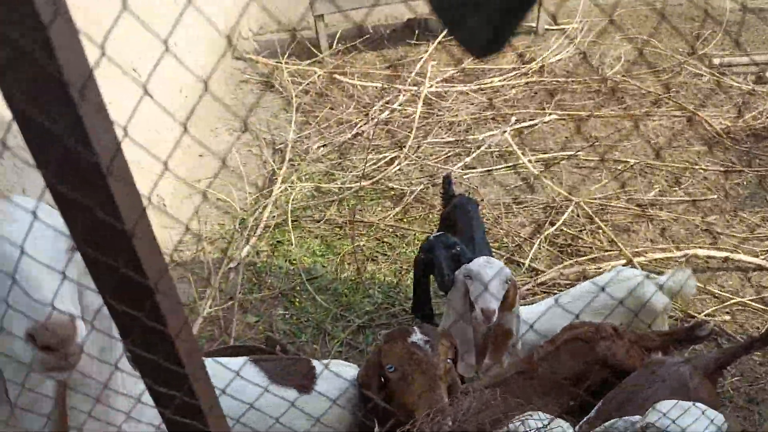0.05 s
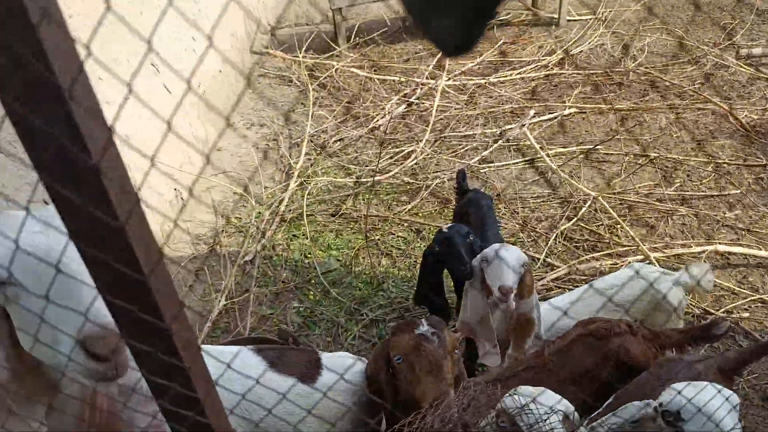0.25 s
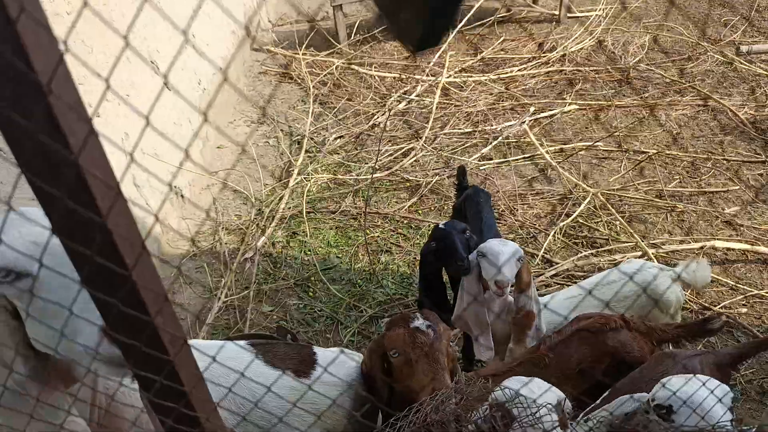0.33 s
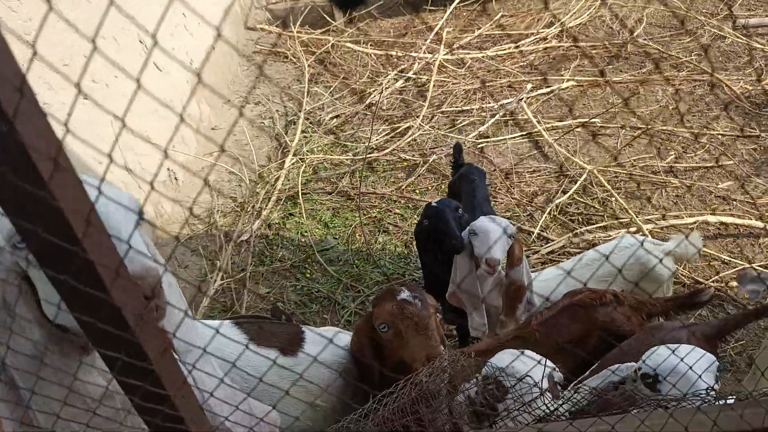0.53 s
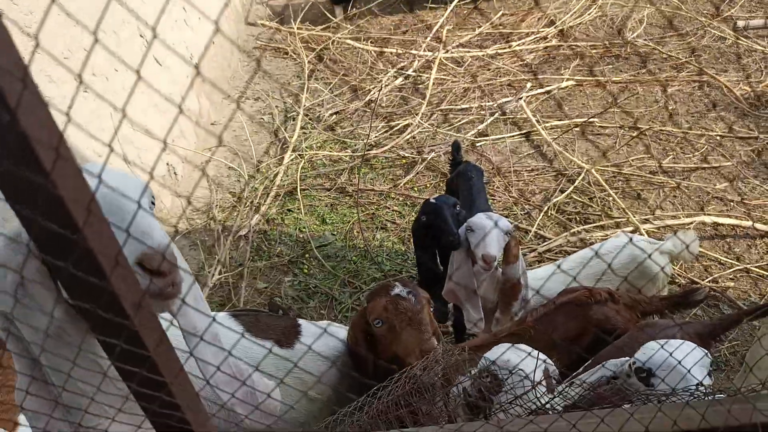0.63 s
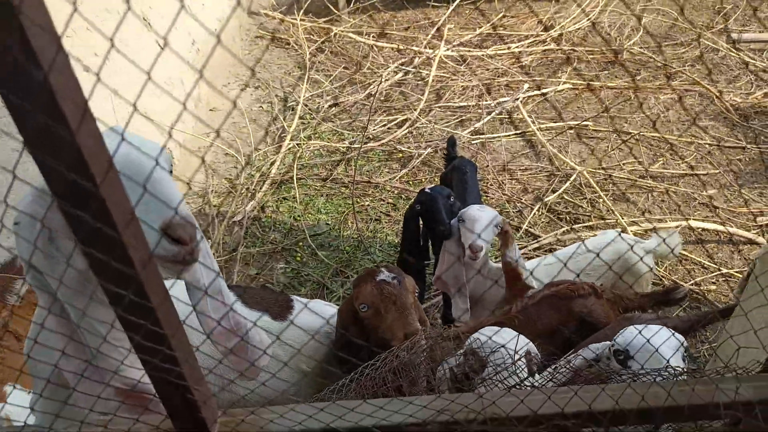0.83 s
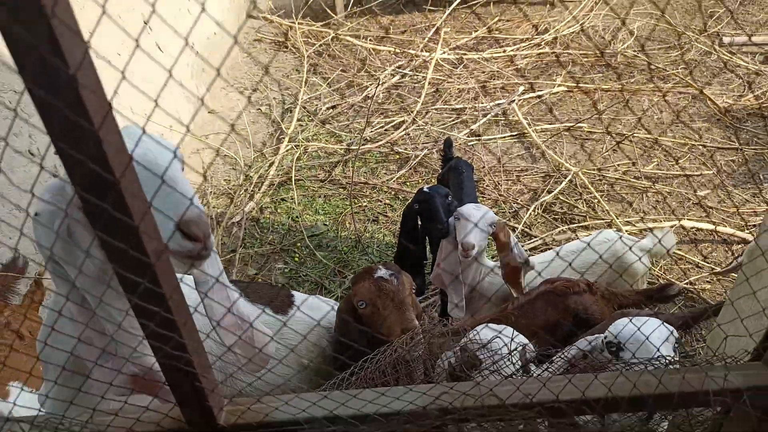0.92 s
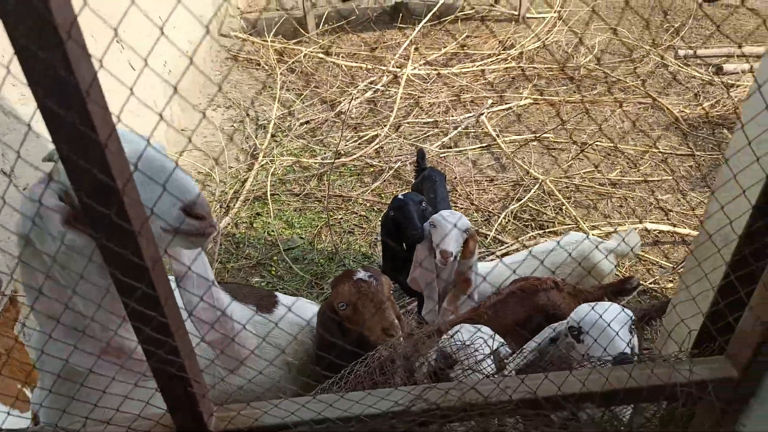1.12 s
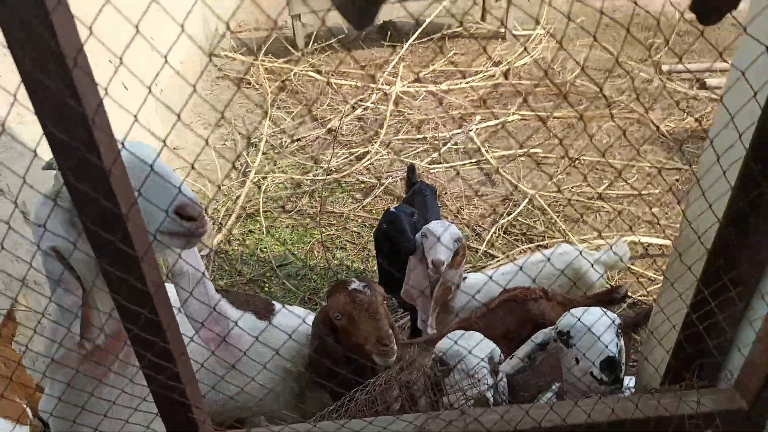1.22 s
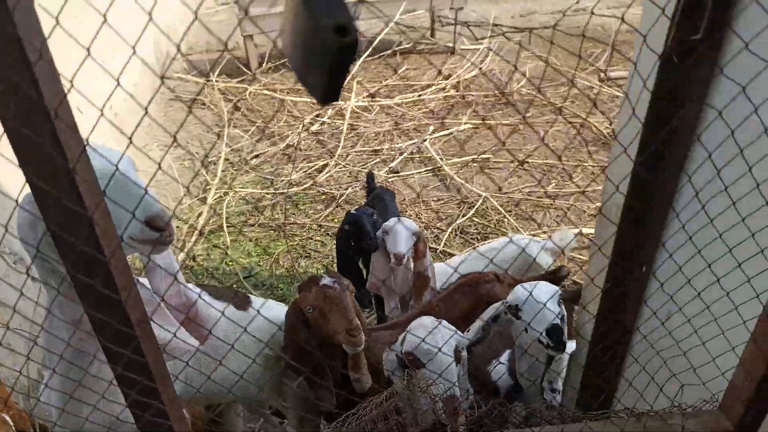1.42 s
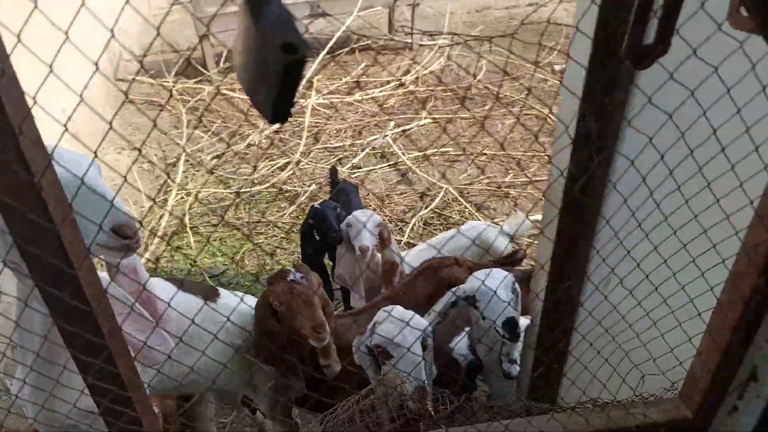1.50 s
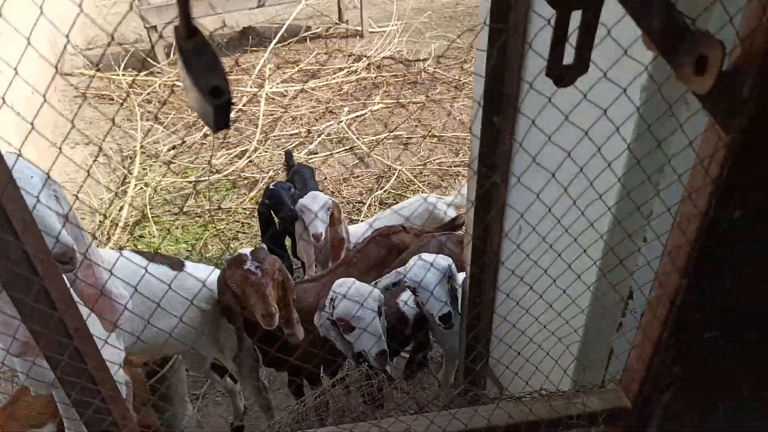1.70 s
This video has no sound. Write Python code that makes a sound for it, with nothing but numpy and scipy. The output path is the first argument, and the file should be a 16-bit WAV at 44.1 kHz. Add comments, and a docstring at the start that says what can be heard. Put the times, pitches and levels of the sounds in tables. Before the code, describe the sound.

In an outdoor pen, the hinge of a steel mesh gate scrapes and squeaks near the microphone, with light wind buffeting. Two sharp, quick knocks follow, and the wire mesh rattles and starts to fade.

```python
"""In a farm pen, a steel gate covered in wire mesh swings open close to the microphone.
Stick-slip friction makes its dry hinge rasp and squeal, jumping from one pitch to the next.
The gate knocks twice; then the mesh rattles, wire against wire, and the frame hums in its low modes.
Light wind bumps the microphone ports."""
import sys
import numpy as np
from scipy import signal
from scipy.fft import rfft, irfft, next_fast_len
from scipy.io import wavfile
from scipy.ndimage import map_coordinates

SR = 44100
rng = np.random.default_rng(int(sys.argv[2]) if len(sys.argv) > 2 else 0)


def materialize(psi):
    """Save the field psi as 16-bit PCM at rate SR to the path in sys.argv[1].

    A 1-D psi becomes a single channel; in a 2-D psi each row is a channel.
    """
    bounded = np.clip(np.atleast_2d(psi).T, -1, 1)
    quanta = np.round(bounded * 32767).astype(np.int16)
    wavfile.write(sys.argv[1], SR, quanta)


N = 77175
TIME = np.arange(N) / SR


def amp(db):
    """Amplitude ratio of a level in decibels."""
    return 10 ** (np.asarray(db) / 20)


def unit(x):
    """Normalisation to rms 1."""
    return x / np.sqrt(np.mean(x ** 2) + 1e-20)


def along(points, hz):
    """Interpolation of (f/Hz, value) points on a logarithmic frequency axis."""
    f, values = np.transpose(points)
    return np.interp(np.log(hz + 1), np.log(f + 1), values)


def curves(rows):
    """Linear interpolation in time: one curve for each column after t/s."""
    times, *columns = np.transpose(rows)
    return [np.interp(TIME, times, column) for column in columns]


def wobble(rate):
    """Smooth random modulation: a spline through `rate` knots a second."""
    return map_coordinates(rng.standard_normal(4096), [TIME * rate], mode="wrap")


def filtered(x, response):
    """Linear filtering: the spectrum of x times a frequency response."""
    size = next_fast_len(N + SR // 2)
    return irfft(rfft(x, size) * response(np.fft.rfftfreq(size, 1 / SR)), size)[..., :N]


def coloured(x, colour):
    """Spectral shaping by (f/Hz, relative level/dB) points, at rms 1."""
    return unit(filtered(x, lambda hz: amp(along(colour, hz))))


def noise(colour, alike):
    """Partly coherent stereo noise: the share `alike` of its power is common to both sides."""
    white = rng.standard_normal((3, N))
    return coloured(np.sqrt(1 - alike) * white[:2] + np.sqrt(alike) * white[2], colour)


def grains(colour, rate, spread_db, t60):
    """Shot noise: tiny random contacts of uneven strength, whose decaying bursts add in energy."""
    contacts = rng.random(N) < rate / SR
    energy = contacts * amp(spread_db * np.minimum(rng.standard_normal(N), 2.5)) ** 2
    decay = amp(-60 * TIME[:SR // 20] / t60) ** 2
    envelope = np.sqrt(np.abs(signal.fftconvolve(energy, decay)[:N]))
    return coloured(envelope * rng.standard_normal((2, N)), colour)


def free_decay(modes, t60, t):
    """Free vibration: each mode is an exponentially damped sinusoid."""
    return sum(amp(db - 60 * t / t60) * np.sin(2 * np.pi * hz * t) for hz, db in modes)


def ringing(modes, t60):
    """Forced vibration: random contacts keep the modes ringing, at rms 1."""
    response = free_decay(modes, t60, TIME)
    return unit(signal.fftconvolve(rng.standard_normal((2, N)), response[None], axes=1)[:, :N])


def wind():
    """Pressure fluctuations buffet the ports, mostly the left, with one stronger puff."""
    # buffeting (t/s, level/dB)
    buffeting = [(0, -34.5), (.05, -42), (.09, -28.5), (.2, -28), (.24, -36), (.34, -71), (.42, -38),
                 (.6, -47), (.8, -35), (.94, -67)]
    # its spectrum (f/Hz, level/dB)
    spectrum = [(20, -24), (60, 2), (115, 13), (170, -0.5), (260, -11.5), (450, -21), (1000, -53.5)]
    gust_s, gust_width_s, gust_db = 0.056, 0.015, -16.5
    gust = amp(gust_db) * np.exp(-.5 * ((TIME - gust_s) / gust_width_s) ** 2)
    envelope = amp(curves(buffeting)[0]) * amp([[0], [-14]]) + gust * amp([[0], [-24]])
    return envelope * noise(spectrum, alike=0.14)


def mesh():
    """Impacts between wires chatter and excite faint resonances; now and then a wire scrapes."""
    # shivering of the mesh (t/s, level/dB)
    shiver = [(0, -40.5), (.23, -49), (.6, -101), (1.03, -28.5), (1.11, -21.5), (1.19, -19.5),
              (1.30, -20.5), (1.37, -23.5), (1.44, -22.5), (1.55, -29.5), (1.75, -40)]
    # spectrum of the wire contacts (f/Hz, level/dB)
    chatter_spectrum = [(200, -37), (900, -8.5), (1700, -8.5), (2100, -2.5), (2700, -4.5), (3600, -3.5),
                        (4700, 2), (5800, -2), (6700, -0.5), (7900, -11), (9400, -16), (10500, -28),
                        (14000, -30), (16000, -60)]
    # wire resonances (f/Hz, level/dB)
    modes = [(2080, 10.5), (2353, 8.5), (4570, 11.5), (4770, -12), (5190, 10), (6430, 8)]
    # thin scrapes (t/s, width/s, level/dB)
    scrapes = [(0, 0.049, -33.5), (1.2, 0.033, -33.5), (1.655, 0.029, -37.5)]
    # their spectrum (f/Hz, level/dB)
    scrape_spectrum = [(2000, -11), (6000, 9), (9300, 1.5), (11000, -11), (15000, -12)]
    chatter = grains(chatter_spectrum, rate=2000, spread_db=3, t60=.025)
    ring = amp(-10.5) * ringing(modes, t60=0.2)
    scraping = sum(amp(db) * np.exp(-.5 * ((TIME - s) / width) ** 2) for s, width, db in scrapes)
    return amp(curves(shiver)[0]) * (chatter + ring) + scraping * noise(scrape_spectrum, alike=0)


def swing():
    """The swinging gate rustles: amplitude-modulated broadband noise."""
    # rustle (t/s, level/dB)
    rustle = [(0, -51), (.15, -54.5), (.18, -38), (.25, -61), (.28, -38), (.32, -77), (.59, -74),
              (.63, -48), (.785, -39), (.83, -49.5), (.865, -35.5), (.91, -61), (1.29, -32.5),
              (1.45, -33.5), (1.75, -44.5)]
    # its spectrum (f/Hz, level/dB)
    spectrum = [(30, 4), (90, -1.5), (250, 9), (450, 10.5), (900, 8.5), (2500, 5), (8000, -26.5)]
    return amp(curves(rustle)[0]) * noise(spectrum, alike=0.49)


def thumps():
    """Damped low transients: wind bumps one port or the other; the last falls with the first knock."""
    # soft thumps (t/s, f/Hz, rise/s, left level/dB, right level/dB)
    pulses = [(.199, 120, .003, -18, -44), (.780, 180, .004, -16, -37), (.848, 130, .004, -36, -23),
              (.868, 140, .004, -35, -23), (1.034, 145, .004, -32, -18)]
    out = np.zeros((2, N))
    for start, hz, rise, left_db, right_db in pulses:
        t = np.maximum(TIME - start, 0)
        envelope = (t / rise * np.exp(1 - t / rise)) ** 2
        out += amp([[left_db], [right_db]]) * envelope * np.sin(2 * np.pi * hz * t)
    return out


def stick_slip(rows, harmonics, ratio=1, edge_db=0):
    """Stick-slip oscillation: a harmonic squeal, brighter when louder, juddering and noisy when rough."""
    jitter_hz, judder_hz, judder_depth = 54.2, 125, .6
    grit, brighten, beat_db = .27, .12, 3.0
    pitch, level, rough = curves(rows)
    fade = np.clip((TIME - rows[0][0]) / .004, 0, 1) * np.clip(1 - (TIME - rows[-1][0]) / .02, 0, 1)
    phase = 2 * np.pi * np.cumsum(ratio * pitch + jitter_hz * rough * wobble(260)) / SR
    judder_phase = 2 * np.pi * np.cumsum(judder_hz * (1 + .25 * wobble(60))) / SR
    judder = 1 + judder_depth * rough * np.sin(judder_phase)
    out = np.zeros(N)
    for k, (_, db) in enumerate(harmonics, 1):
        skirt = grit * min(k, 3) * np.sqrt(np.abs(rough)) * (wobble(520) + 1j * wobble(520))
        size = amp(level + db + brighten * (k - 1) * (level + 20) + beat_db * wobble(95))
        edge = amp(edge_db * max(k - 2, 0))
        out += size * edge * np.imag((1 + skirt) * np.exp(1j * k * phase))
    return np.sqrt(2) * fade * judder * out


def hinge_squeals():
    """Self-excited vibration: friction locks the hinge on one pitch after another."""
    # course of each squeal (t/s, f/Hz, level/dB, roughness 0-1)
    chirp = [(.238, 4540, -48, .03), (.249, 4520, -29, .05), (.254, 4480, -8.5, .02), (.260, 4440, -9, .15),
             (.270, 4410, -17, .55), (.297, 4370, -17, .3), (.308, 4386, -29, .3), (.328, 4390, -25, .2),
             (.35, 4386, -32, .6), (.49, 4390, -36, .3)]
    groan = [(.28, 1465, -40, .5), (.305, 1475, -35, .4), (.355, 1600, -26, .25), (.42, 1630, -26, .25),
             (.45, 1639, -32, .15), (.64, 1638, -46, .2)]
    whistle = [(.395, 7065, -36, .2), (.413, 7057, -14, .08), (.432, 7057, -13.5, .04),
               (.44, 7058, -28, .05), (.505, 7058, -26, .08)]
    squeal = [(.48, 2020, -36, .1), (.491, 2005, -20.5, .12), (.506, 1990, -19.5, .2),
              (.526, 2000, -20, .5), (.546, 1986, -23.5, .2), (.56, 1984, -18.5, .07),
              (.595, 1983, -23, .1), (.65, 1982, -30, .25), (.72, 1981, -25, .08), (.785, 1980, -24, .1),
              (.812, 1980, -34, .1)]
    cheep = [(.64, 3280, -75, 0.53), (.655, 3266, -22, 0.53), (.672, 3245, -18, 0.37),
             (.71, 3336, -36.5, 0.13), (.80, 3226, -38, 0.12)]
    # harmonics of a squeal at -20 dB (harmonic number, relative level/dB)
    chirp_tones = [(1, -3), (2, -8.5), (3, -24)]
    groan_tones = [(1, 0), (2, -8.5), (3, -1.5), (4, -6)]
    squeal_tones = [(1, -8.5), (2, -.5), (3, 0), (4, -8), (5, -9), (6, -19), (7, -22)]
    # spectral tilt above the second harmonic (t/s, gain per harmonic/dB)
    tilt = [(.48, -4), (.505, 0), (.57, 0), (.66, -4.5)]
    side_ratio = 2767 / cheep[-1][1]  # a weaker, lower tone sounds along with the cheep
    return (stick_slip(chirp, chirp_tones)
            + stick_slip(groan, groan_tones)
            + stick_slip(whistle, [(1, 0.017)])
            + stick_slip(squeal, squeal_tones, edge_db=curves(tilt)[0])
            + stick_slip(cheep, [(1, 1.5), (2, -24)])
            + stick_slip(cheep, [(1, -11)], side_ratio))


def gate_ring(drive):
    """Convolution with a decaying impulse response: the steel rings on after whatever shakes it."""
    # decay times of the gate (f/Hz, t60/s)
    decay_times = [(200, .15), (2000, .26), (5000, .2), (15000, .15)]
    hz, t, white = signal.stft(rng.standard_normal((2, SR // 2)), SR, nperseg=256)
    decay = amp(-60 * t / along(decay_times, hz)[:, None])
    tail = signal.istft(white * decay, SR, nperseg=256)[1]
    return signal.fftconvolve(drive[None], tail / np.linalg.norm(tail[0]), axes=1)[:, :N]


def hinge_rasp():
    """Dry sliding friction: dense tiny contacts make a grainy noise and ring the hinge's modes."""
    # rasp (t/s, level/dB)
    rasp_level = [(.258, -46.5), (.282, -16.5), (.31, -24.5), (.345, -29.5), (.39, -15), (.425, -19),
                  (.45, -24.5), (.52, -24.5), (.58, -37.5), (.61, -26), (.64, -27), (.668, -24.5),
                  (.72, -34.5), (.845, -30.5), (.885, -23.5), (.96, -39.5), (1.03, -38), (1.08, -48)]
    # its spectrum (f/Hz, level/dB)
    spectrum = [(100, -86), (600, -26), (1200, -12), (1650, 1.5), (2700, 3), (3600, 1), (4600, 8.5),
                (5500, 2.5), (6500, 9.5), (8000, -2), (9600, -1), (10800, -26.5), (13000, -13.5),
                (16000, -31)]
    # resonances of the scraped hinge (f/Hz, level/dB)
    modes = [(3296, 3), (4665, 3), (4807, -16), (5380, -3), (6730, -15)]
    # their ringing (t/s, level/dB)
    ring_level = [(.30, -50), (.345, -29), (.41, -25), (.54, -44), (.6, -70)]
    rasp = amp(curves(rasp_level)[0]) * grains(spectrum, rate=3500, spread_db=3.5, t60=.016)
    return rasp + amp(curves(ring_level)[0]) * ringing(modes, t60=.16)


def hinge_shriek():
    """The last stick-slip oscillation, whose fundamental grows as the hinge slows."""
    # course of the shriek (t/s, f/Hz, level/dB, roughness 0-1)
    course = [(.812, 2100, -30, .1), (.819, 2070, -16, .12), (.833, 2026, -13, .02), (.858, 2028, -11, .03),
              (.872, 2040, -16, .3), (.89, 2068, -18, .6), (.925, 2074, -18, .25), (.968, 2071, -28, .3),
              (1.005, 2062, -23, .45), (1.016, 2062, -24, .45)]
    # its harmonics at -20 dB (harmonic number, relative level/dB)
    harmonics = [(1, -5), (2, -4), (3, -8.5), (4, -14), (5, -28), (6, -33), (7, -40)]
    # spectral tilt above the second harmonic (t/s, gain per harmonic/dB)
    tilt = [(.82, -5), (.858, 1.5), (.92, 1), (.96, -.5)]
    # swell of the fundamental (t/s, gain/dB)
    swell = [(.82, 1), (.86, -8), (.90, 0), (.935, 7), (.958, 7), (.985, 0), (1.016, 8)]
    shriek = stick_slip(course, harmonics, edge_db=curves(tilt)[0])
    fundamental = filtered(shriek, lambda hz: 1 / (1 + (hz / 3000) ** 16))
    return shriek + (amp(curves(swell)[0]) - 1) * fundamental


def knocks():
    """Impact excitation: a bright clash of loose steel over a dull thud and the frame's low modes."""
    # blows (t/s, clash level/dB, thud level/dB, clash t60/s)
    blows = [(1.033, -6, -20.5, 0.098), (1.0846, -3, -8, 0.15)]
    # spectra of clash and thud (f/Hz, level/dB)
    clash_spectrum = [(150, -51), (250, -22.5), (945, -10.5), (1290, -17), (1730, -11.5), (2090, -29),
                      (2280, -10.5), (3630, -15), (4710, -7.5), (6210, -3.5), (9560, -15.5), (11000, -33),
                      (15500, -28)]
    thud_spectrum = [(30, -31), (80, -4), (150, 4.5), (250, -25), (340, 0.5), (480, 4.5), (600, -18),
                     (1200, -1.5), (3000, -17.5)]
    # low modes that a blow sets off (f/Hz, level/dB)
    modes = [(145, -3), (335, -4), (410, 2), (480, 1)]
    attack_s, thud_rise_s, thud_t60 = 0.0007, 0.0042, 0.056
    out = np.zeros((2, N))
    for start, clash_db, thud_db, clash_t60 in blows:
        t = np.maximum(TIME - start, 0)
        clash = amp(clash_db - 60 * t / clash_t60) * noise(clash_spectrum, alike=0.056)
        thud = amp(-60 * t / thud_t60) * noise(thud_spectrum, alike=0.85)
        body = amp(-3) * free_decay(modes, t60=0.046, t=t)
        low = amp(thud_db) * (1 - np.exp(-t / thud_rise_s)) * (thud + body)
        out += (1 - np.exp(-t / attack_s)) * (clash + low)
    return out


def frame_hum(last_knock_s=1.0846):
    """Resonance: after the knocks the frame hums in narrow bands that waver in amplitude and phase."""
    # modes of the frame (f/Hz, level/dB)
    modes = [(96, -48), (146, -49), (209, -48.5), (300, -45)]
    # swell of the hum (t/s, gain/dB)
    swell = [(1.12, -37), (1.3, -3.5), (1.45, 3.5), (1.75, -1.5)]
    hum = np.zeros(N)
    for hz, db in modes:
        waver = wobble(22.0) + 1j * wobble(21.94)
        hum += amp(db) * np.real(waver * np.exp(2j * np.pi * hz * TIME))
    return hum * amp(curves(swell)[0]) * (TIME > last_knock_s)


def scene():
    """Superposition: a level difference sets the gate to the right; wind acts on the ports themselves."""
    # stereo balance of the gate (f/Hz, left minus right level/dB)
    balance = [(100, -1.5), (900, -2), (2000, -4), (3300, -3), (4100, -5.5), (5200, -7.5), (6500, -7.5),
               (8000, -4), (9500, 4), (11000, 1.5), (14000, -5.5)]
    lead_rad, ring_db = 1.55, -7  # the squeals lead in phase on the left, and ring the gate
    sides = np.array([[.5], [-.5]])
    squeals = hinge_shriek() + hinge_squeals()
    direct = filtered(squeals, lambda hz: np.exp(1j * lead_rad * sides))
    hinge = direct + hinge_rasp() + amp(ring_db) * gate_ring(squeals)
    gate = hinge + knocks() + mesh() + frame_hum() + swing()
    return filtered(gate, lambda hz: amp(along(balance, hz) * sides)) + thumps() + wind()


def record(dry):
    """Band limiting and soft saturation: deep bass and top treble are cut, the highest peaks rounded."""
    low_cut_hz, top_hz = 51.4, 15750
    cut = signal.sosfilt(signal.butter(2, low_cut_hz, "high", fs=SR, output="sos"), dry)
    rounded = cut / (1 + np.abs(cut) ** 8) ** (1 / 8)
    return filtered(rounded, lambda hz: hz < top_hz)


dry = scene()
out = record(dry)
materialize(out)
```